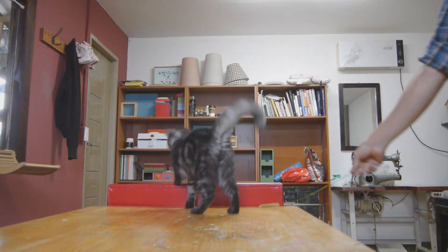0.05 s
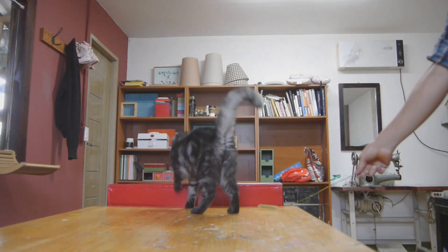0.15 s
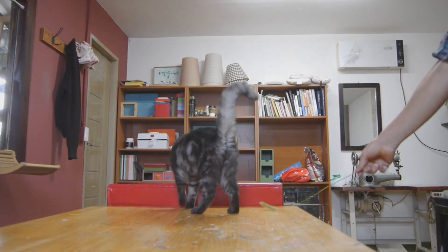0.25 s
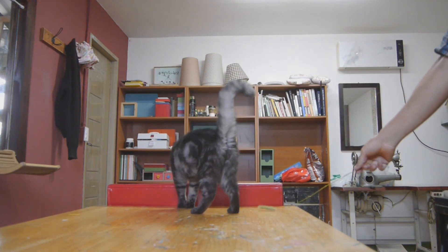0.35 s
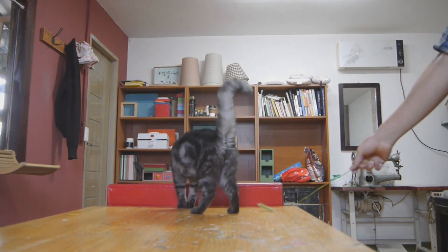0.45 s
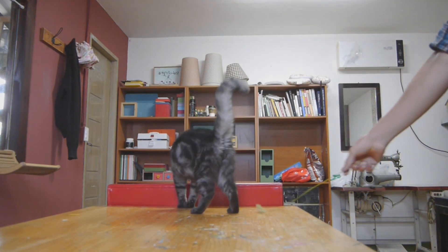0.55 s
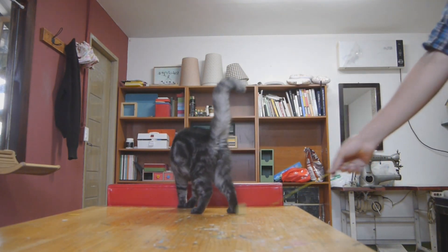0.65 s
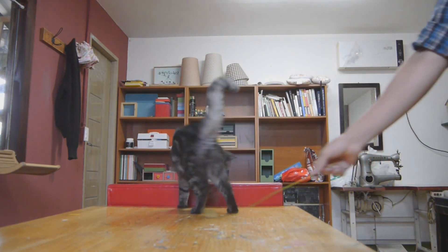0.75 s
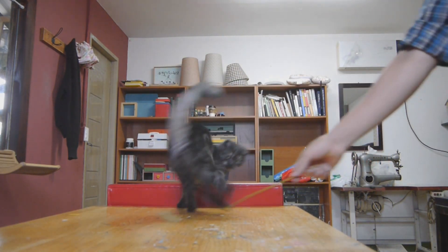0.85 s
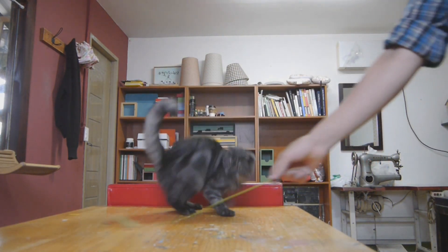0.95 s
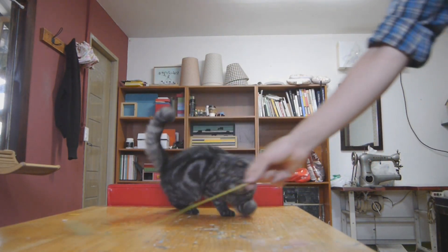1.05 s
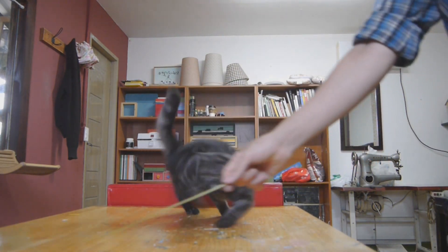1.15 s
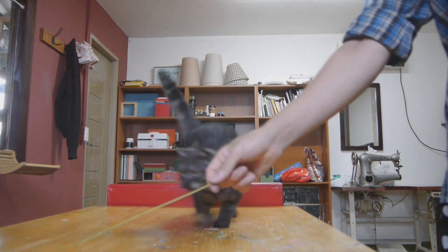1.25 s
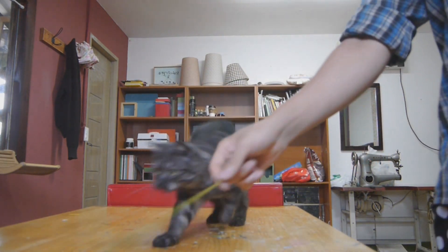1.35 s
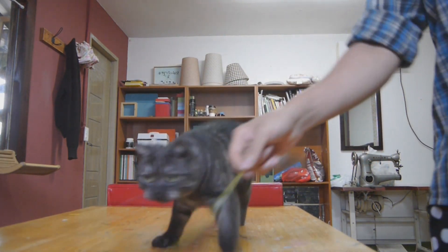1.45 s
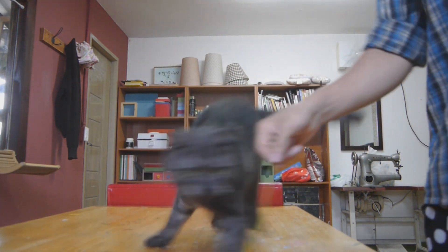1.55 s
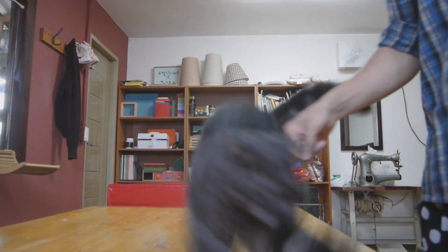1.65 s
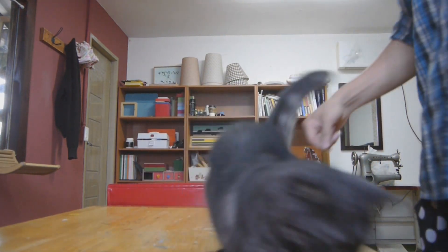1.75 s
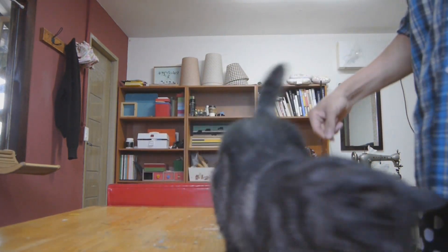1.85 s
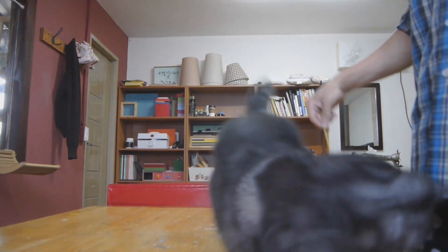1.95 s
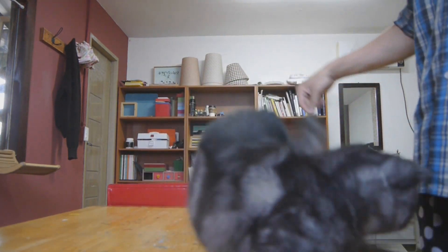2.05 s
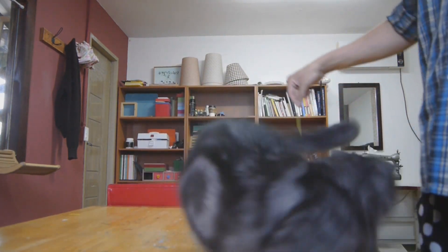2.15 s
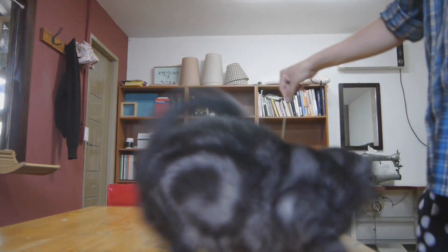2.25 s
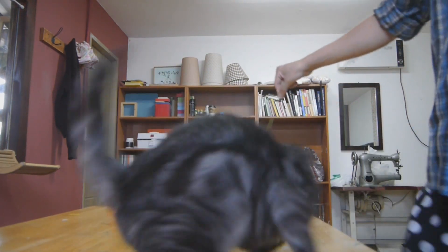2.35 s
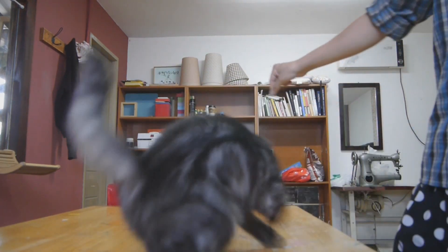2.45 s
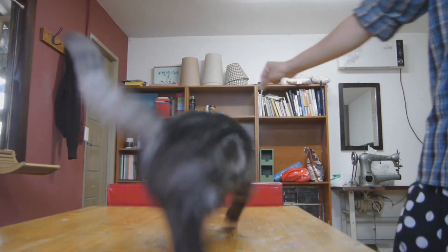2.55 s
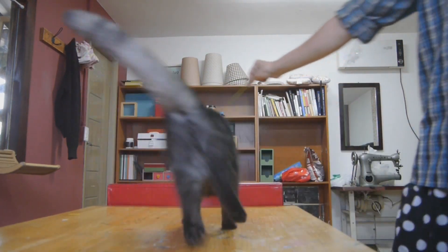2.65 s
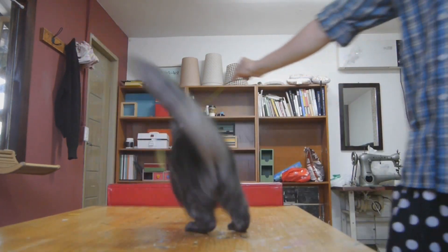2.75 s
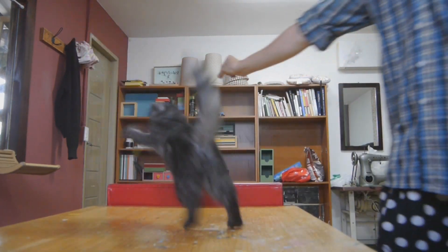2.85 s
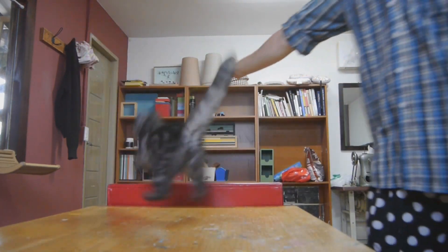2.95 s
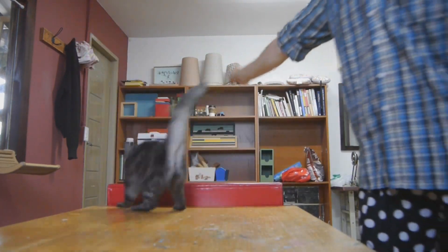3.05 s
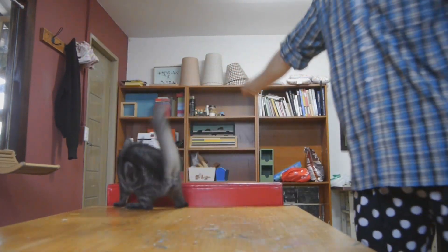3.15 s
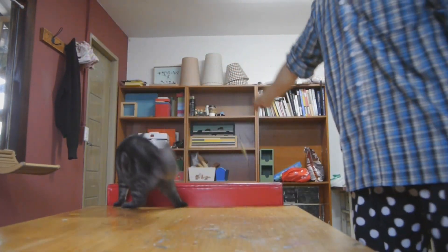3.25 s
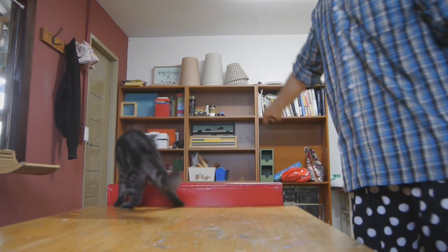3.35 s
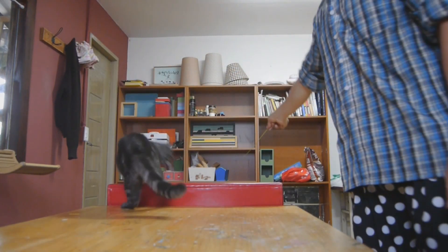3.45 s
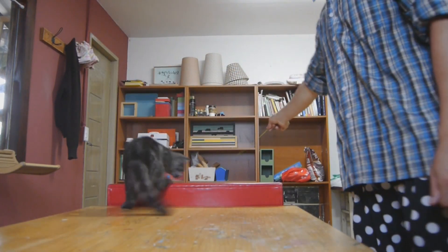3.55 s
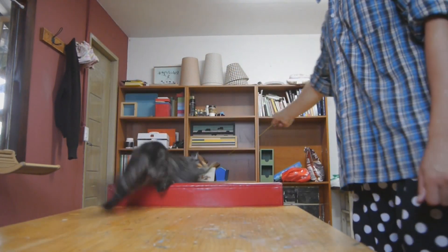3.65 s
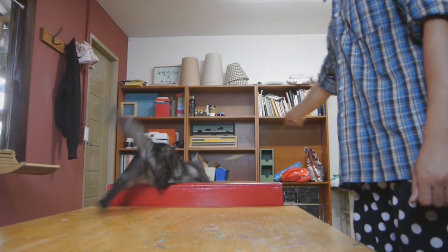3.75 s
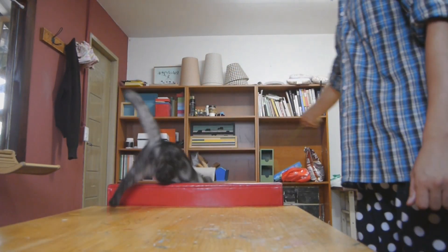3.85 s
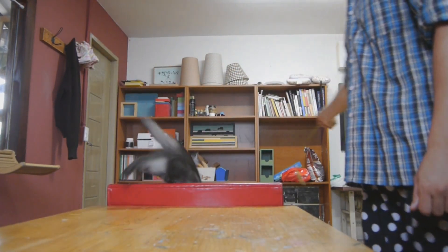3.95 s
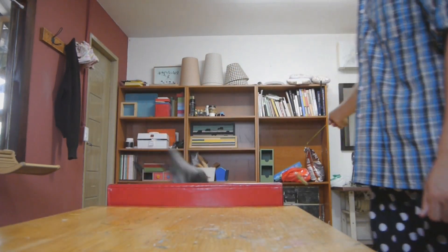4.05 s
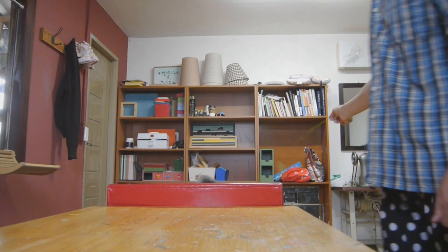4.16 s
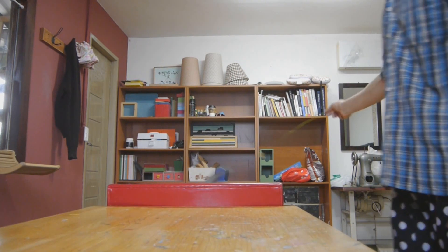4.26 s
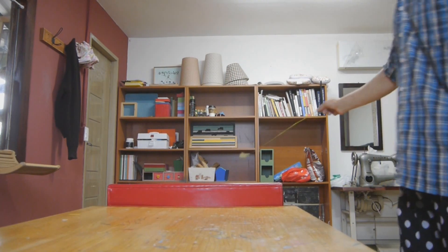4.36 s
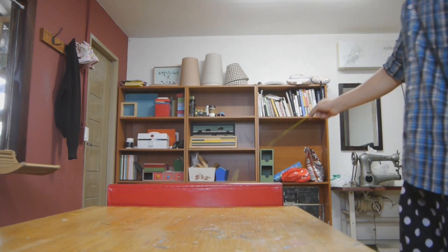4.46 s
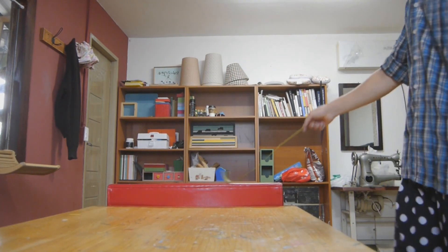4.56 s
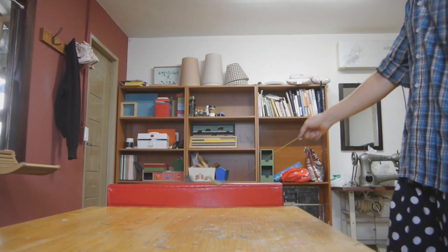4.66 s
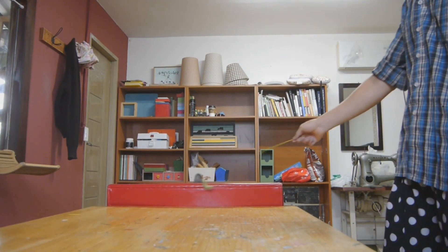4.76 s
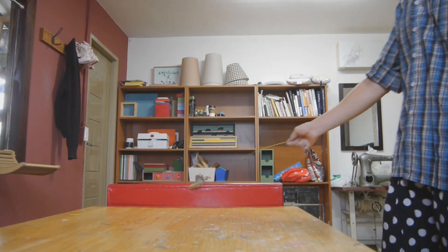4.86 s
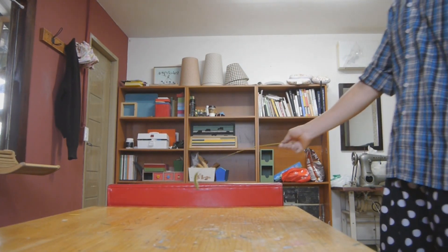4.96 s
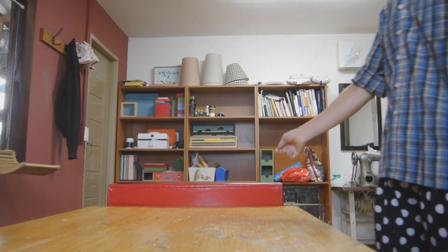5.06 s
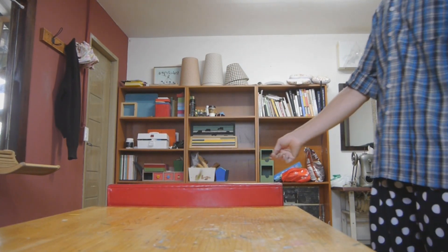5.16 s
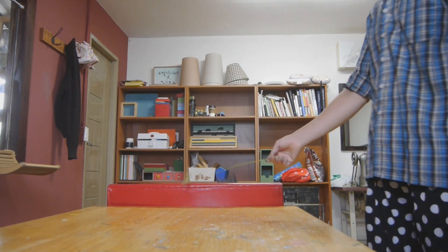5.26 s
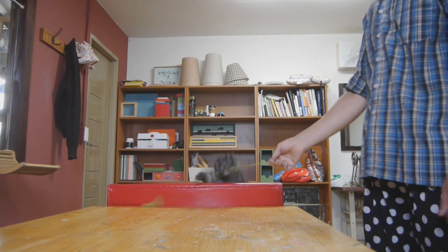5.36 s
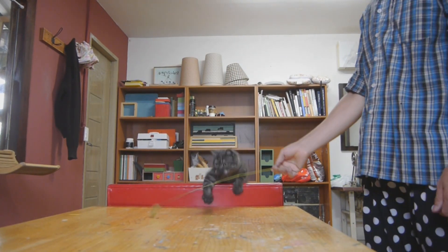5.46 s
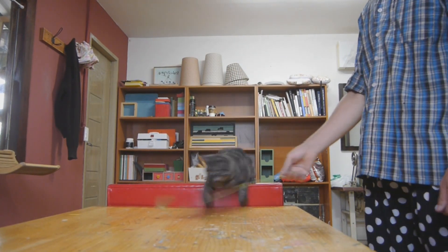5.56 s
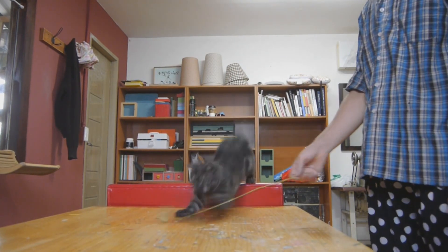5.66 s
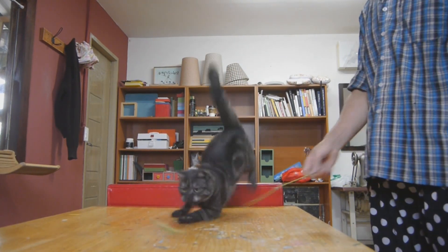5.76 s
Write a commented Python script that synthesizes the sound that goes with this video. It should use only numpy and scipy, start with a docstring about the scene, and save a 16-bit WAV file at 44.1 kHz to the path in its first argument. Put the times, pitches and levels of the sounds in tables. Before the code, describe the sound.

Close stereo microphones at a wooden table in a small, live room. At 0 s a soft paw knock, then a few very faint, thin, downward chirps until 0.4 s, over quiet low air and a barely audible wavering hum. At 1.04 s a firm landing with claw scratch; light footfalls and scrapes follow. From 1.7 to 2.9 s the cat is very near: a loud, weighty thud at 1.83, sharper knocks at 2.17 and 2.47, bright claw scratches, skids and raspy pad rubs, fur sliding between. At 3.15 s comes the heaviest clustered thud, the tabletop ringing woodily, with a tiny very high whistle. Then sparse: faint scrapes at 3.5-3.9, a landing off the far end at 4.12, muffled bumps at 4.4-4.6 and 5.1-5.4, soft shirt rustling strongest near 4.6. Two quick landings with short scratches at 5.59 and 5.78 s bring the cat back.

```python
"""A cat chases a toy wand over a wooden table in a small, hard-walled room, heard by two close microphones.
Paws thump as short damped pushes that set the table top ringing in its modes; claws, wand and pads
scrape across it as runs of tiny catches in the grain. The cat leaps off the far end and climbs back.
Faint gliding chirps, a rustling shirt, noise-made room air and a faint wavering hum lie underneath."""
import sys
import numpy as np
from scipy import signal
from scipy.fft import rfft, irfft, next_fast_len
from scipy.io import wavfile
from scipy.ndimage import map_coordinates

SR = 44100
rng = np.random.default_rng(int(sys.argv[2]) if len(sys.argv) > 2 else 0)


def waveform_to_disk(signal):
    """Save audio, clipped to [-1, 1], as 16-bit WAV at the path in sys.argv[1]."""
    frames = np.transpose(np.atleast_2d(signal))
    scaled = np.clip(frames, -1, 1) * 32767
    samples = np.round(scaled).astype(np.int16)
    wavfile.write(sys.argv[1], SR, samples)


N = 256220

CONTACT_CYCLES = 0.52   # a push peaks after this many cycles


def push(force_db, hz, pad_cut):
    """A blow flexes the top for a few cycles; the soft pad takes off the treble above pad_cut times the pitch."""
    cycles = hz * np.arange(SR // 12) / SR
    rise = cycles / CONTACT_CYCLES
    flex = rise * np.exp(1 - rise) * np.sin(2 * np.pi * cycles)
    pad = signal.butter(2, min(pad_cut * hz, SR / 3), fs=SR, output="sos")
    return from_db(force_db) * signal.sosfilt(pad, flex)


# hard landings of a paw:
# (time [s], knock level [dB], pitch of the knock [Hz], weight level [dB], skid level [dB])
LANDINGS = [ (0.002, -28.5, 452, -26, -46.5), (1.036, -17.5, 930, -19, -46), (1.827, -9.5, 677, -8.5, -47),
            (2.1739, -11.5, 1800, -24, -27.5), (2.471, -14, 760, -24.5, -33.5),
            (2.858, -23, 815, -26.5, -38.5), (3.1461, -12, 1350, -8, -29), (4.119, -18.5, 850, -26, -36),
            (5.5871, -21.5, 635, -20, -47), (5.777, -19.5, 990, -27, -31.5)]
# single soft thumps: footfalls, and further thuds within the heavy landing:
# (time [s], force level [dB], pitch [Hz])
THUMPS = [ (1.055, -34, 162), (1.289, -33, 308), (1.433, -39, 940), (1.470, -30, 298), (1.664, -35, 320),
          (1.809, -21, 477), (1.888, -28.5, 266), (2.500, -24.5, 277), (2.560, -27.5, 290),
          (2.731, -16.5, 870), (2.758, -28, 208), (3.151, -8.5, 665), (3.156, -11.5, 292),
          (3.163, -13, 174), (3.171, -12, 490), (3.475, -38.5, 353), (4.142, -26, 219), (4.431, -28, 216),
          (4.622, -35.5, 310), (5.138, -27, 232), (5.349, -30, 364), (5.366, -23.5, 280), (5.620, -42, 300),
          (5.780, -31, 158)]
# the cat comes close to the microphones and goes away again: (time [s], direct sound level [dB])
NEARNESS = [(0, 5), (1.05, 3), (1.5, 2.5), (1.85, 7.5), (2.5, 4.5), (2.86, -2.5), (3.15, 5.5), (4.5, -2.5),
            (5.6, 5.5)]
DIRECT_DB = -2   # direct thud, on top of the nearness
TICK_HZ, TICK_DB = 3240, -20   # tick of the claws, level against the knock
WEIGHT_HZ, WEIGHT_DELAY_S = 345, 0.002855   # the weight comes down on the paw
SETTLE_HZ, SETTLE_DELAY_S, SETTLE_DB = 181.4, 0.02, -13   # the body settles, level against the weight


def paws(pad_cut, count):
    """A landing is tick, knock, weight and settling, a thump one push; dealt in turn to tracks, and a direct thud."""
    blows = list(THUMPS)
    for s, knock_db, hz, weight_db, _ in LANDINGS:
        blows.append((s, knock_db + TICK_DB, TICK_HZ))
        blows.append((s, knock_db, hz))
        blows.append((s + WEIGHT_DELAY_S, weight_db, WEIGHT_HZ))
        blows.append((s + SETTLE_DELAY_S, weight_db + SETTLE_DB, SETTLE_HZ))
    force = np.zeros((count, N))
    for k, (s, force_db, hz) in enumerate(blows):
        add(force[k % count], push(force_db, hz, pad_cut), s)
    thud = force.sum(0) * from_db(DIRECT_DB + in_time(NEARNESS))
    return force, thud


# modes of the wooden table top: (frequency [Hz], peak gain [dB], time to fall by 60 dB [s])
TABLE_MODES = [ (137.4, 15.5, 0.37), (170, 10.5, 0.37), (194.2, 0, 0.16), (234, 8, 1), (287, -10, 1),
               (320.6, 10.5, 0.35), (355.8, 7.5, 0.24), (401, 13.5, 0.46), (408, -3.5, 0.079),
               (479.4, 10.5, 0.14), (500, -31, 0.23), (628, 11, 0.1), (732, -2, 0.24), (783, 10, 0.22),
               (931, 5, 0.11), (1040, 1, 0.22), (1102, 7, 0.14), (1316, 5, 0.022), (1610, -25, 0.068),
               (1690, -7, 0.12), (2030, -10, 0.1), (2230, -6, 0.096), (3220, -62, .07), (3460, -29, .07),
               (3710, 0, 0.019), (4330, -6, 0.095)]


def table(force):
    """The top rings in its modes, each a damped resonator, neighbours in opposite phase."""
    out = np.zeros(N)
    for k, (hz, gain_db, t60) in enumerate(TABLE_MODES):
        radius = np.exp(-np.log(1000) / (t60 * SR))
        angle = 2 * np.pi * hz / SR
        top = (-1) ** k * from_db(gain_db) * (1 - radius)
        resonance = [1, -2 * radius * np.cos(angle), radius * radius]
        out += signal.lfilter([top, 0, -top], resonance, force + 1e-18)
    return out


# colour of a scrape on the wood, also used for the shirt: (frequency [Hz], level per Hz [dB])
SCRAPE_COLOUR = [(60, -5), (150, -2.5), (400, 3.5), (800, -1), (1300, 0.5), (2300, -2.5), (3500, -4.5),
                 (5500, -9.5), (7500, -16), (11000, -23.5), (15500, -32.5)]


def grit(size, brightness, grains_per_s=7000, grain_db=3.5, slips_per_s=220, slip_db=0.5, patchy_db=1.5):
    """A dense run of tiny catches in the wood grain, bunched by stick and slip; unit power."""
    catches = (rng.random(size) < grains_per_s / SR) * rng.choice([-1, 1], size)
    catches = catches * from_db(grain_db * np.minimum(rng.exponential(1, size), 4))
    slip_steps = np.arange(size) / SR * slips_per_s
    slips = np.interp(slip_steps, np.arange(size), rng.standard_normal(size))
    # each scrape gets its own slightly uneven colour, drawn at random
    knots = np.geomspace(60, 15500, 30)
    levels = at_hz(SCRAPE_COLOUR, knots) + patchy_db * rng.standard_normal(len(knots))
    return rms_one(colour(catches * from_db(slip_db * slips), np.c_[knots, levels], brightness))


# claw and wand strokes: (time [s], swell [s], fade [s], level [dB], brightness [dB per octave])
STROKES = [ (1.056, 0.0043, 0.031, -37, 0.5), (1.115, 0.025, 0.075, -42, -0.5),
           (1.325, 0.019, 0.052, -46, -1), (1.431, 0.002, .018, -48, 1), (1.4645, 0.0075, 0.079, -38.5, -1),
           (1.629, 0.0076, .08, -42, 2), (1.720, .004, 0.04, -32, 2.5), (1.755, 0.042, 0.018, -31, 1.5),
           (2.190, 0.019, 0.098, -35.5, .5), (2.366, 0.019, 0.19, -34.5, .5),
           (2.442, 0.032, 0.016, -22.5, 1.5), (2.555, 0.035, 0.019, -36, 2.5),
           (2.726, 0.01, 0.038, -33, -0.5), (2.854, 0.013, 0.034, -34, 2.5),
           (3.116, 0.0066, 0.028, -40.5, -1.5), (3.195, 0.051, 0.086, -41, 4),
           (3.668, 0.026, 0.12, -48, -2.5), (3.726, 0.038, 0.058, -36.5, 2.5),
           (3.908, 0.018, 0.04, -43.5, 3.5), (4.119, 0.0023, 0.005, -45.5, 15),
           (4.130, .03, 0.068, -48.5, 5), (4.34, 0.036, .12, -45.5, -5), (5.085, 0.026, 0.18, -46.5, -2.5),
           (5.348, 0.0078, 0.094, -39, -6.5), (5.587, 0.00065, 0.0031, -34.5, -1),
           (5.643, 0.0024, 0.033, -30, -3.5), (5.771, 0.0018, 0.078, -31.5, -1.5)]
# the paw skids on after a landing; brightness in dB per octave
SKID_SWELL_S, SKID_FADE_S, SKID_BRIGHTNESS = 0.0017, 0.061, -2.27


def claws(count):
    """Strokes, and a skid with each landing, swell and fade with the pressure; dealt in turn to tracks."""
    out, size = np.zeros((count, N)), 2 ** 14
    t = np.arange(size) / SR
    skids = [(s, SKID_SWELL_S, SKID_FADE_S, skid_db, SKID_BRIGHTNESS) for s, *_, skid_db in LANDINGS]
    for k, (s, swell, fade, level_db, brightness) in enumerate(list(STROKES) + skids):
        pressure = np.minimum(t / swell, 1) * np.exp(-np.maximum(t - swell, 0) / fade)
        add(out[k % count], from_db(level_db) * pressure * grit(size, brightness), s)
    return out


# a pad drags and rasps on the varnish: (time [s], length [s], level [dB], centre of the rasp [Hz])
RUBS = [(2.348, 0.096, -37, 1300), (2.562, 0.047, -34.5, 1150), (2.655, .12, -31, 1220),
        (3.465, 0.056, -45.5, 603), (4.012, 0.054, -50, 730), (4.335, 0.074, -49.5, 940),
        (5.035, 0.16, -49.5, 765)]
RUB_OCTAVES, RUB_EDGE_S = 1.5, 0.025   # width of the rasp; time to take hold and let go


def rubs(count):
    """A dragging pad sticks and slips in one broad band; dealt in turn to tracks."""
    out = np.zeros((count, N))
    for k, (s, length_s, level_db, hz) in enumerate(RUBS):
        t = np.arange(0, length_s, 1 / SR)
        edges_hz = hz * 2 ** (RUB_OCTAVES * np.array([-0.5, 0.5]))
        band = signal.butter(2, edges_hz, "band", fs=SR, output="sos")
        rasp = rms_one(signal.sosfilt(band, grit(len(t), 0, slips_per_s=254, slip_db=2.0)))
        hold = np.minimum(np.minimum(t, length_s - t) / RUB_EDGE_S, 1)
        add(out[k % count], from_db(level_db) * hold * rasp, s)
    return out


# fur and toy keep sliding over the top between the strokes: (time [s], level [dB])
SLIDE = [(0.88, -90), (0.97, -52.5), (1.2, -60), (1.42, -58.5), (1.6, -53.5), (1.93, -45.5), (2.03, -52.5),
         (2.14, -44), (2.33, -54), (2.55, -41), (2.83, -50.5), (3.01, -47), (3.1, -63), (3.6, -71)]


def slide():
    """Fur and toy slide softly, with slower and deeper slips than a claw."""
    return from_db(in_time(SLIDE)) * grit(N, 0, slips_per_s=60, slip_db=4.0, patchy_db=-1)


def glide(points):
    """A thin tone that swells and fades along a line of (time [s], frequency [Hz])."""
    s, hz = np.transpose(points)
    t = np.arange(s[0], s[-1], 1 / SR)
    swell = np.sin(np.linspace(0, np.pi, len(t)))
    return swell * np.sin(2 * np.pi * np.cumsum(np.interp(t, s, hz)) / SR)


# faint thin chirps, all with the same downward glide: (time [s], level [dB])
CHIRPS = [(0.054, -55), (0.114, -60.5), (0.184, -64), (0.321, -67), (0.364, -71)]
CHIRP_S, CHIRP_START_HZ, CHIRP_END_HZ = 0.0293, 4150, 3490
# one very high whistle arches up and down: (time [s], frequency [Hz])
WHISTLE = [(2.97, 11500), (3.08, 13400), (3.175, 12650)]
WHISTLE_DB = -66


def chirps():
    """Thin whistles, each a single sine that slides in pitch."""
    out = np.zeros(N)
    for s, level_db in CHIRPS:
        add(out, from_db(level_db) * glide([(0, CHIRP_START_HZ), (CHIRP_S, CHIRP_END_HZ)]), s)
    add(out, from_db(WHISTLE_DB) * glide(WHISTLE), WHISTLE[0][0])
    return out


def microphones(x, lag_ms, scatter_db, scatter_s):
    """Sound reaches the right microphone a moment late; the top and the recorder's case scatter its treble."""
    n, t = np.arange(N), np.arange(SR // 50) / SR
    late = map_coordinates(x, [n - lag_ms * SR / 1000], order=3)
    scatter = diffuse_noise(len(t)) * np.exp(-t / scatter_s) / np.sqrt(scatter_s * SR / 2)
    treble = signal.sosfilt(signal.butter(1, 1200, "high", fs=SR, output="sos"), x)
    scattered = signal.fftconvolve(treble[None], scatter, axes=1)[:, :N]
    return np.array([x, late]) + from_db(scatter_db) * scattered


# ring of the small room: (frequency [Hz], time to fall by 60 dB [s])
ROOM_T60 = [(100, 0.87), (300, 0.53), (800, 0.49), (2000, 0.33), (5000, 0.49), (9000, 0.59), (15000, 0.21)]


def room(x, first_echo_s, build_s):
    """Wall echoes thicken into a diffuse tail that dies band by band."""
    size = 2 ** 15
    t, spectrum = np.arange(size) / SR, rfft(diffuse_noise(size))
    centres = np.geomspace(100, 12800, 8)
    tail = 0
    for hz, share in zip(centres, np.eye(len(centres))):
        band = irfft(spectrum * at_hz(np.c_[centres, share], bins(size)))
        tail = tail + band * np.exp(-np.log(1000) * t / at_hz(ROOM_T60, hz))
    onset = 1 - np.exp(-np.maximum(t - first_echo_s, 0) / build_s)
    energy = np.sum(np.exp(-2 * np.log(1000) * t / at_hz(ROOM_T60, 1000)))
    return signal.fftconvolve(x[None], tail * onset / np.sqrt(energy), axes=1)[:, :N]


# shirt rustling as the wand is waved: (time [s], level [dB])
SHIRT = [(0, -74), (0.8, -85), (1.0, -62), (3.5, -60.5), (3.9, -58.5), (4.6, -52), (4.882, -66),
         (4.94, -58.5), (5.0, -56.5), (5.3, -56), (5.8, -55.5)]


def shirt(brightness):
    """Cloth slides softly against the arm: noise in the scrape's colour, tilted in dB per octave."""
    return from_db(in_time(SHIRT)) * rms_one(colour(diffuse_noise(N), SCRAPE_COLOUR, brightness))


# colour of the room air: (frequency [Hz], level per Hz [dB])
AIR_COLOUR = [(25, -35), (45, -38), (62, -0.5), (95, -13), (160, 0.5), (270, 1.5), (640, -5.5), (850, -1.5),
              (1300, -10), (2100, -16), (4500, -22), (8000, -27), (13000, -30.5), (15500, -44)]
AIR_DB = -58


def room_air():
    """Quiet steady air, diffuse noise strongest in the bass and low middle."""
    return from_db(AIR_DB) * rms_one(colour(diffuse_noise(N), AIR_COLOUR))


HUM_HZ, HUM_WIDTH_HZ, HUM_DB = 947, 20, -72   # a faint wavering tone in the room air


def hum():
    """A narrow resonance, excited by noise, stands faintly out of the room air."""
    resonance = signal.iirpeak(HUM_HZ, HUM_HZ / HUM_WIDTH_HZ, fs=SR)
    return from_db(HUM_DB) * rms_one(signal.lfilter(*resonance, diffuse_noise(N)))


# two close microphones in a diffuse field: (frequency [Hz], level of side against mid [dB])
WIDTH = [(30, -9), (120, -23.5), (250, -18.5), (500, -9), (1000, -4), (2000, 0.5), (4000, 1.5), (8000, 0.5),
         (15000, -3)]


def diffuse_noise(size):
    """Stereo noise, alike at both microphones in the bass and less alike in the treble."""
    mid, side = rng.standard_normal((2, size))
    return mid + colour(side, WIDTH) * [[1], [-1]]


def colour(x, points, tilt=0):
    """Give noise a spectrum; the tilt in dB per octave acts in the middle and treble."""
    size = next_fast_len(x.shape[-1])
    hz = bins(size)
    octaves = np.log2(np.clip(hz, 900, 9000))
    gain = from_db(at_hz(points, hz) + tilt * octaves)
    return irfft(rfft(x, size) * gain, size)[..., :x.shape[-1]]


def from_db(db):
    """Decibels to gain."""
    return 10 ** (np.asarray(db) / 20)


def rms_one(x):
    """Scale to unit power."""
    return x / np.sqrt(np.mean(x ** 2) + 1e-20)


def at_hz(points, hz):
    """Read a table on a log-frequency axis."""
    knots, values = np.transpose(points)
    return np.interp(np.log(np.maximum(hz, 1)), np.log(knots), values)


def in_time(points):
    """Read a curve at every sample."""
    return np.interp(np.arange(N) / SR, *np.transpose(points))


def bins(size):
    """Frequencies of a real transform, in Hz and at least 1."""
    return np.maximum(np.fft.rfftfreq(size, 1 / SR), 1)


def add(track, sound, s):
    """Mix a sound into a track at a time in seconds."""
    start = max(round(s * SR), 0)
    track[start:start + len(sound)] += sound[:N - start]


def scene():
    """Blows and scrapes sound directly, through the table and through the room."""
    force, thud = paws(pad_cut=1.82, count=5)
    scrapes = claws(count=5) + rubs(count=5)
    scrapes[0] += slide()
    whistles = chirps()
    wood = table(from_db(-1) * force.sum(0) + from_db(-6) * scrapes.sum(0))
    # each path to the microphones has its own scatter
    paths = [thud + wood + from_db(3) * whistles, *(from_db(2.0) * scrapes)]
    near = sum(microphones(path, lag_ms=0.035, scatter_db=-4.5, scatter_s=0.0035) for path in paths)
    # events are dealt in turn to a few tracks, each with its own echo pattern
    radiated = from_db(-3.0) * force + from_db(-4.0) * scrapes
    radiated = radiated + from_db(-23) * wood + from_db(-5) * whistles
    echoes = sum(room(track, first_echo_s=0.0057, build_s=0.00063) for track in radiated)
    # an open board radiates little deep bass
    cat = signal.sosfilt(signal.butter(2, 65, "high", fs=SR, output="sos"), near + echoes)
    return cat + shirt(brightness=4.1) + room_air() + hum()


CUTOFF_HZ = 15800


def record(dry):
    """The recorder thins the deep bass and cuts the top steeply."""
    thinned = signal.sosfilt(signal.butter(1, 45, "high", fs=SR, output="sos"), dry)
    return signal.sosfilt(signal.ellip(10, 0.1, 80, CUTOFF_HZ, fs=SR, output="sos"), thinned)


dry = scene()
out = record(dry)
waveform_to_disk(out)
```